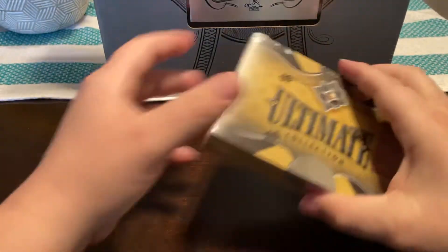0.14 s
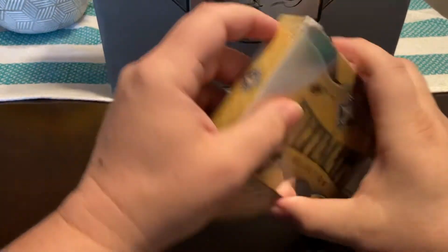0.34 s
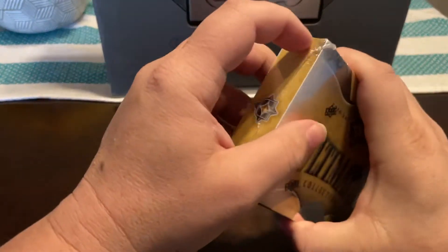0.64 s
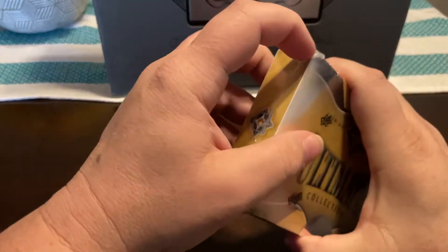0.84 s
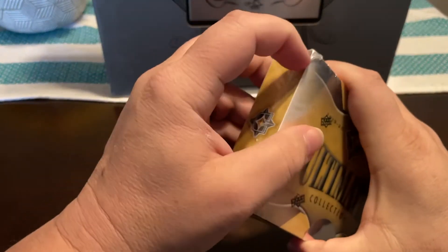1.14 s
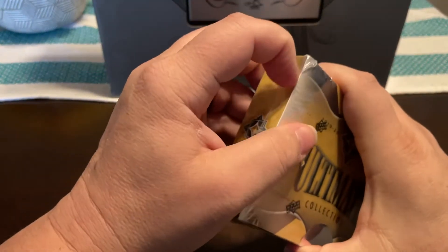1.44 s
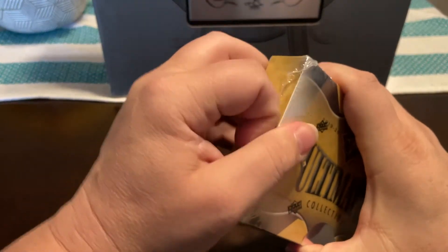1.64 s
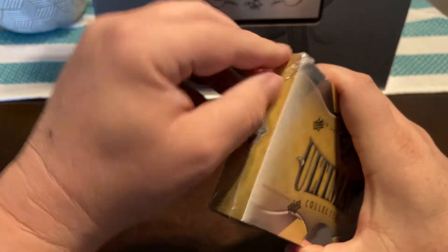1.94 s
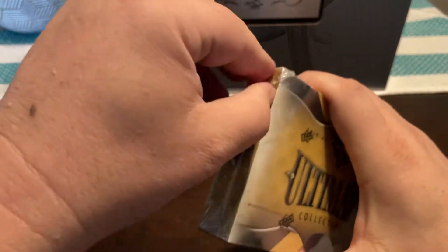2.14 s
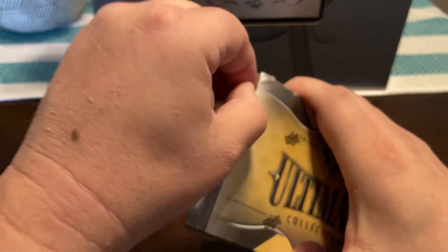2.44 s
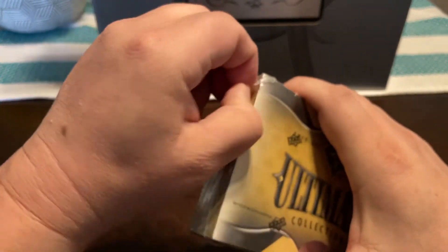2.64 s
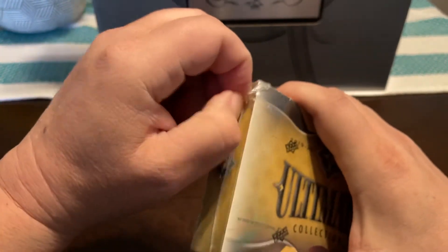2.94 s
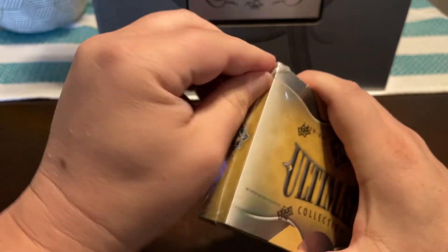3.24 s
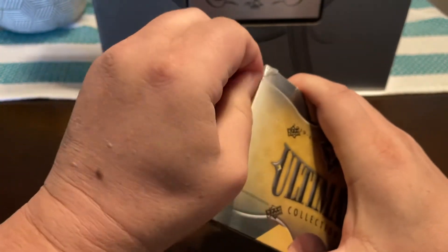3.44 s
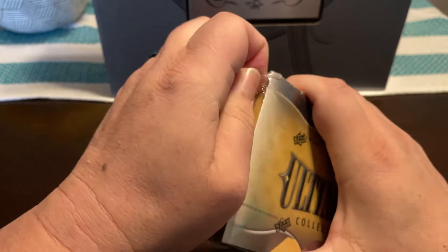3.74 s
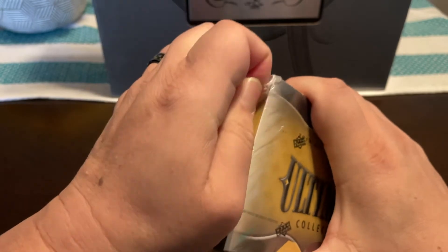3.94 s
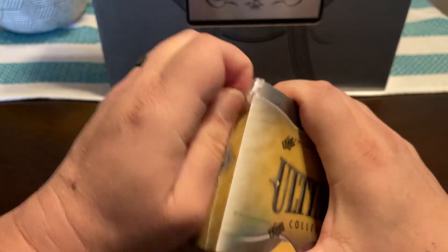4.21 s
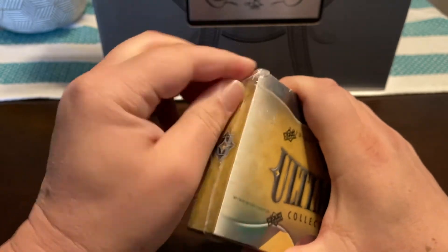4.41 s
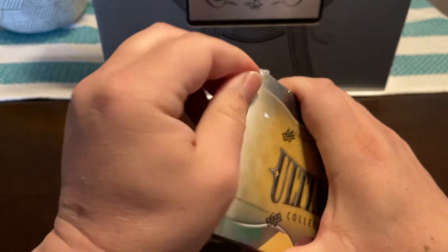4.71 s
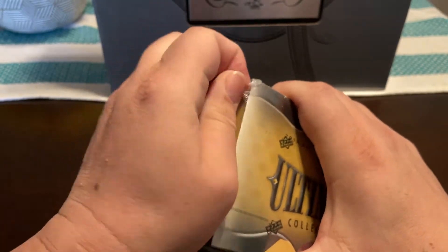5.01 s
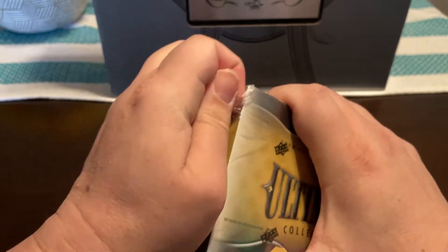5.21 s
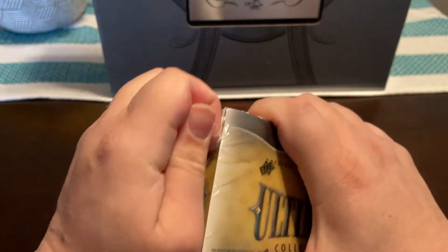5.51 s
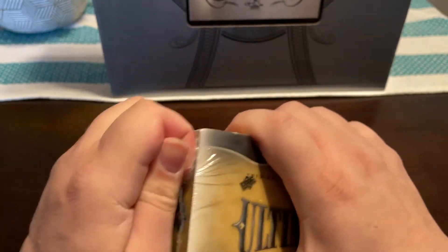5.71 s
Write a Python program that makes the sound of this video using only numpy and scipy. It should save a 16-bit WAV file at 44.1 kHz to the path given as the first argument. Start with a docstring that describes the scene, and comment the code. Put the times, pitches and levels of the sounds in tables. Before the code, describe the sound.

Close, thin ticks and scratches of fingernails on a shrink-wrapped box, with dull knocks and a sharp snap early on.

```python
"""In a quiet room, fingers pick at tight shrink-wrap on a small cardboard box, close to two microphones.
Wrinkles of the film buckle with bright ticks and its blisters pop; nails and skin scrape and rustle by
stick-slip friction. Taps excite the hollow of the box, and once a nail slips off the edge, so that the
face springs back with a loud snap. The box knocks dully on the table; a low hum fills the room."""
import sys
import numpy as np
from scipy import signal
from scipy.fft import rfft, irfft
from scipy.io import wavfile
from scipy.ndimage import uniform_filter1d

SR = 44100
rng = np.random.default_rng(int(sys.argv[2]) if len(sys.argv) > 2 else 0)


def master(y):
    """Save y as 16-bit WAV."""
    cut = np.clip(np.atleast_2d(y).T, -1, 1)
    pcm = np.round(cut * 32767)  # scale
    wavfile.write(sys.argv[1], SR, pcm.astype(np.int16))


N = 258426
TIME = np.arange(N) / SR

# spectra of the card under a nail and of the rustling film: frequency_hz, relative_db
CARD_SPECTRUM = [(150, -13.5), (380, 0), (560, -9), (780, -5), (1000, 7), (1140, -1.5), (1300, 6.5),
                 (1520, -9.5), (1900, -1), (2600, -6.5), (4000, -10.5), (7000, -26)]
FILM_SPECTRUM = [(1000, -20.5), (2500, -7.5), (4000, -1.5), (6300, -2.5), (8300, -10.5), (10500, -1.5),
                 (12500, -8.5), (14000, -6), (16500, -28.5)]
# the snap of the box face as the nail slips off: time_s, peak_db
SNAP = (1.455, -3)


def film_ticks(strays, span_s=0.0042):
    """Buckling: each wrinkle gives a bright tick at its own pitch and a broader, lower crack."""
    # the clearest wrinkles: start_s, level_db, crack_relative_db, pitch_hz
    wrinkles = [(0.1703, -54, -1, 13200), (0.8374, -42, -5, 12300), (0.84, -50, -3, 10600),
                (1.039, -57, -15, 13900), (1.1358, -60, -19.5, 10300), (1.1495, -46, -5, 9460),
                (1.166, -34.5, -16, 10100), (1.1852, -47, -13, 10400), (1.2042, -41.5, -11.5, 11000),
                (1.294, -54.5, -1, 10700), (1.316, -40.5, -5, 10000), (1.3242, -43, -2, 11000),
                (1.3369, -35.5, -2.5, 9500), (1.4323, -53, -2.5, 11900), (1.4415, -49, 5, 13000),
                (1.4518, -22.5, -3.5, 9950), (1.595, -59, 2, 11900), (1.6337, -58, 2, 11200),
                (1.701, -63.0, 7.5, 10300), (1.8107, -46.5, -9.5, 10700), (1.8188, -55, -7.5, 10200),
                (1.831, -49.5, -5, 10200), (1.8342, -51, 2, 12900), (1.8596, -64, 5, 9300),
                (1.8807, -56, 11, 10700), (1.9032, -53.5, 0.5, 10500), (1.9078, -50, -5, 13900),
                (1.9628, -35.0, -11, 12300), (1.978, -51.5, -23, 11000), (1.9884, -30.5, -3.5, 11200),
                (2.0351, -40, -5, 10500), (2.0728, -60, 6.5, 10800), (2.1818, -50.5, 1.5, 10500),
                (2.1927, -56.5, -7, 10800), (2.263, -48, -7, 12900), (2.3233, -47, -6.0, 11900),
                (2.3402, -54, -3.0, 13700), (2.408, -63.5, 7.5, 12500), (2.5297, -58.5, -10, 9800),
                (2.5872, -44.5, -8, 9800), (2.619, -53, -2.5, 8540), (2.6367, -53, -6.5, 13560),
                (2.8508, -57, -0.5, 13500), (2.8783, -57, -14, 10800), (2.8853, -63, 9.5, 9300),
                (2.9044, -60.5, 9.0, 10600), (2.9192, -54.5, 7.5, 9600), (2.9418, -62, 8.0, 9900),
                (2.977, -61, 3, 11900), (3.0481, -56, 5, 11420), (3.0883, -52, -2.5, 10600),
                (3.1029, -62.5, 4.5, 10700), (3.136, -61.5, -6.5, 10940), (3.1905, -51, -9.5, 14700),
                (3.2203, -64.5, 9, 10650), (3.228, -60, -2.5, 11000), (3.39, -59.5, 1.5, 9850),
                (3.585, -55.0, -6, 11300), (3.6707, -58.5, 3.5, 9600), (3.6953, -52.5, -7, 9900),
                (3.706, -58, -4, 13600), (3.7323, -50.5, -8, 12800), (3.7476, -53, -4, 9600),
                (3.7747, -50.5, -16, 10500), (3.8018, -56, 5, 10400), (3.811, -49.5, -0.5, 10900),
                (3.8165, -52.5, -2, 11100), (3.8906, -51.5, -18, 11300), (3.8972, -51, -11.5, 10000),
                (3.928, -55.5, -2, 9100), (3.953, -50.5, 4.5, 9800), (4.0675, -59.5, -7.0, 14000),
                (4.087, -49, -10, 14500), (4.1021, -48, -6, 12300), (4.1216, -43, -1.5, 10100),
                (4.1286, -48, -1, 10500), (4.1409, -42.5, -5, 10000), (4.1687, -49.0, 4, 9700),
                (4.1938, -58, -9, 11000), (4.4923, -39, -6, 11000), (4.535, -55, 3, 10900),
                (4.561, -61, 6, 9900), (4.5821, -60, -11, 12300), (4.598, -52.5, -12, 11200),
                (4.679, -59, -2, 9000), (4.6987, -38, -11.5, 13300), (4.7046, -44.5, -13.5, 11300),
                (4.7333, -47.5, -8, 10800), (4.7664, -57, -2, 9500), (4.7912, -44, -7.5, 9100),
                (4.7954, -46.5, -6, 9700), (4.8504, -49, -5.5, 11300), (4.8683, -52.5, -2, 13500),
                (4.9528, -56.5, 1, 14100), (4.9887, -41, -12, 10000), (4.992, -49, -8.0, 12200),
                (4.996, -58, 6.5, 10900), (5.0797, -55, 4.0, 7900), (5.127, -66, 5.0, 11900),
                (5.175, -48.5, -6, 10400), (5.188, -60.5, 2, 11600), (5.2015, -58.0, 4, 11700),
                (5.2349, -59.5, -6.5, 14200), (5.2486, -53.0, -12, 15200), (5.2596, -65, 7, 10600),
                (5.3423, -42.5, -3.5, 9800), (5.4121, -36.5, -6.5, 10600), (5.4408, -46, -0.5, 12600),
                (5.4874, -49.5, 0.5, 12300), (5.4925, -47.5, -5, 9600), (5.5101, -54, -19, 13700),
                (5.534, -54, -3.0, 9900), (5.7081, -51.5, 6.5, 10000), (5.7183, -51.0, 0, 11200),
                (5.7352, -56, -14, 12800), (5.7564, -47.5, -1, 10500), (5.7659, -50, -5.0, 12400),
                (5.7762, -42.5, 4, 11900), (5.787, -51, -12, 10600), (5.797, -52, -11, 11500)]
    # spectrum of a tick: pitch_ratio, relative_db
    tick_shape = [(0.198, -54.5), (0.572, -31.5), (0.8, -5.5), (0.942, 1), (1.05, 2.5), (1.18, -5),
                  (1.38, -5.5), (1.572, -18)]
    # spectrum of a crack: frequency_hz, relative_db
    crack_shape = [(300, -24.5), (1200, -7), (2500, -6), (4000, 1), (6300, 4), (8000, -4.5), (11000, -22.5)]
    out = np.zeros((2, N))
    for start, db, crack_db, pitch_hz in wrinkles + strays:
        release = burst(decay_s=.0007, scatter_db=-3, apart=.6)
        tick = colour(release, [(ratio * pitch_hz, level) for ratio, level in tick_shape])
        stretch = rng.uniform(.8, 1.2)
        rasp = burst(decay_s=0.0022, scatter_db=8, apart=1.2)
        crack = colour(rasp, [(hz * stretch, level) for hz, level in crack_shape])
        add(out, start, sized(tick, db, span_s) + sized(crack, db + crack_db, span_s))
    return out


def stray_wrinkles(on_film, per_s=22, above_drag_db=3, scatter_db=3.5, crack_db=-1.5, pitch_hz=10100):
    """A Poisson process: rows for film_ticks at random times, louder as the film is dragged harder."""
    onsets = np.flatnonzero(rng.random(N) < per_s / SR)
    db = 20 * np.log10(on_film) + above_drag_db + scatter_db * rng.standard_normal(N)
    return [(i / SR, db[i], crack_db, pitch_hz * (1 + 0.11 * rng.uniform(-1, 1))) for i in onsets]


def blister_pops(span_s=0.0041):
    """Snap-through: a loose patch of film flips with a rasp, in three modes that the finger damps."""
    # blisters popping against the card: start_s, level_db, pitch_hz
    blisters = [(1.034, -61.5, 1260), (1.296, -40.5, 1400), (1.318, -39.5, 1410), (1.7, -53.5, 1260),
                (1.8334, -40.5, 1510), (1.859, -42, 1400), (1.906, -50, 1370), (2.953, -47, 1227),
                (3.671, -54, 3505), (3.695, -50.5, 1280), (3.733, -52, 1100), (3.769, -49, 1050),
                (3.829, -50.5, 2300), (3.83, -58, 4400), (3.881, -47, 1040), (4.098, -45.5, 1030),
                (4.17, -41.5, 1004), (4.539, -51, 1340), (4.727, -60, 1100), (4.766, -59.5, 1165),
                (4.843, -51.5, 1160), (4.857, -48.5, 2770), (4.953, -53.5, 1160), (4.996, -45.5, 3600),
                (5.002, -55.5, 1250), (5.016, -56, 1050), (5.049, -48.5, 1090), (5.081, -57, 1080),
                (5.109, -50.5, 3430), (5.113, -49.5, 6000), (5.19, -50, 890), (5.258, -40, 2090),
                (5.443, -46, 1330)]
    out = np.zeros((2, N))
    for start, db, hz in blisters:
        t60 = 11 / hz + .0015
        second_hz, third_hz = hz * rng.uniform(1.15, 1.5), hz * rng.uniform(1.8, 2.6)
        patch = ring([(hz, 0, t60), (second_hz, -5, t60), (third_hz, -9, t60 / 2)], size=2048)
        pop = signal.fftconvolve(burst(decay_s=0.0011, scatter_db=5.5), patch[None], axes=1)
        add(out, start, sized(pop, db, span_s))
    return out


def face_snap(size=6000):
    """Free vibration: the released box face springs back, and its modes ring off and stir the room."""
    # modes of the card face: frequency_hz, relative_db, t60_s
    modes = [(380, -18, .026), (620, -25, .024), (935, -3.5, .018), (1360, 0, .023), (1530, -8, .024),
             (1782, -5, .022), (2150, -15, .02), (2517, -19, .016), (3810, -17, .014), (4046, -17, .012)]
    snap_s, peak_db = SNAP
    t = np.arange(-size, size) / SR
    swing = np.exp(-(np.minimum(t, 0) / .0012) ** 2)  # rises in about a millisecond
    age = np.maximum(t, 0)
    face = swing * sum(gain_of(db - 60 * age / t60) * np.sin(2 * np.pi * hz * t) for hz, db, t60 in modes)
    out = np.zeros((2, N))
    add(out, snap_s + t[0], mic_pair(gain_of(peak_db) * face / abs(face).max(), lag_samples=3))
    return out + reverberation(out, tail_db=-27.5, early_db=-27)


def snap_tail(level_db=-37, fade_db_per_s=230, length_s=.14):
    """Exponential decay: a short, grainy crunch near 1.4 kHz fades after the snap."""
    # spectrum of the crunch: frequency_hz, relative_db
    spectrum = [(300, -19.5), (800, -14.5), (1150, -8), (1400, 2), (1750, -1), (2600, -11), (4000, -13),
                (7000, -17), (12000, -23)]
    t = np.arange(round(length_s * SR)) / SR
    crunch = colour(stick_slip(per_s=900, spread_db=0.5, hiss_db=-6.5), spectrum)[:, :len(t)]
    out = np.zeros((2, N))
    add(out, SNAP[0], unit_rms(crunch) * gain_of(level_db - fade_db_per_s * t))
    return out


def box_taps(contact_s=.0012, span_s=0.0097, size=4096):
    """Impact: a fingertip sounds the cavity and the walls, whose modes the grip shifts; the nail clacks."""
    # fingers meeting the box: start_s, knock_db, pitch_hz, t60_s, nail_db
    taps = [(0.081, -37, 415, 0.022, -47), (0.105, -40.5, 347, 0.025, -54), (0.2, -40.5, 405, 0.026, -46),
            (0.407, -59, 320, 0.024, -49), (0.838, -43.5, 395, 0.03, -40), (0.8451, -35, 343, 0.058, -49.5),
            (0.912, -48.5, 354, 0.027, -60.5), (1.295, -46, 420, 0.025, -54.5),
            (1.333, -39.5, 285, 0.052, -42), (1.833, -43.5, 380, 0.04, -47.5),
            (1.859, -41, 360, 0.043, -38), (1.989, -34, 375, 0.022, -38), (2.904, -53, 444, 0.034, -46),
            (3.221, -56.5, 374, .025, -53), (3.482, -42, 324, 0.011, -53), (3.767, -56.5, 390, 0.024, -51),
            (4.17, -64, 513, 0.011, -46), (4.198, -41, 403, 0.018, -47), (4.215, -35.5, 419, 0.07, -46),
            (4.342, -42, 415, 0.029, -53), (4.526, -39.5, 395, 0.033, -52.5), (4.841, -55, 278, 0.03, -57),
            (5.129, -48.5, 403, 0.028, -48.5), (5.246, -45.5, 327, 0.023, -53.5),
            (5.411, -69, 337, 0.017, -44.5), (5.446, -70, 503, 0.027, -53), (5.657, -46.5, 298, 0.032, -57),
            (5.779, -52.5, 290, 0.016, -42)]
    out, t = np.zeros((2, N)), np.arange(size) / SR
    onset = 1 - np.exp(-t / contact_s)
    for start, knock_db, hz, t60, nail_db in taps:
        lower, upper = rng.uniform(0.7, .8), rng.uniform(1.1, 1.8)
        knock = onset * ring([(hz, 0, t60), (hz * lower, -8, t60), (hz * upper, -14, t60)], size)
        clack = colour(burst(decay_s=0.0044, scatter_db=4.5), CARD_SPECTRUM)
        add(out, start, mic_pair(sized(knock, knock_db, span_s)))
        add(out, start, sized(clack, nail_db, span_s))
    return out


def nail_scrapes(film_trim_db=-1):
    """Stick-slip: a dragged nail catches and lets go hundreds of times a second, shaking card and film."""
    # strokes of the nail: start_s, end_s, card_db, film_db
    strokes = [(0.071, 0.13, -49, -59.5), (0.179, 0.202, -46.5, -65), (0.834, 0.862, -49.5, -65),
               (1.311, 1.359, -46.5, -72), (1.448, 1.46, -23.5, -32.5), (1.566, 1.636, -50.5, -50),
               (1.694, 1.726, -56, -65.5), (1.814, 1.89, -51, -59), (1.981, 2.01, -49, -57),
               (2.907, 2.952, -50.5, -61.5), (3.773, 3.865, -59, -86), (4.076, 4.186, -52, -52),
               (4.168, 4.216, -42, -46.5), (4.305, 4.354, -47, -58), (4.513, 4.541, -52.5, -59),
               (4.934, 5.065, -66, -79), (5.175, 5.213, -57, -72), (5.246, 5.27, -44.5, -60),
               (5.75, 5.811, -54.5, -49)]
    on_card, on_film = np.zeros((2, N))
    for start, end, card_db, film_db in strokes:
        stroke = signal.windows.tukey(round((end - start) * SR), 0.099)
        add(on_card, start, gain_of(card_db) * stroke)
        add(on_film, start, gain_of(film_db) * stroke)
    friction = stick_slip(per_s=800, spread_db=4, hiss_db=-6)
    card = colour(friction * on_card, CARD_SPECTRUM)
    film = colour(friction * on_film, FILM_SPECTRUM)
    return moving_contact(card + gain_of(film_trim_db) * film, depth_db=3)


def finger_drag(rise_share=0.32, fall_share=0.36):
    """Frictional drive: envelopes for card and film, from a creeping grip and slides that swell and fade."""
    # creep of the grip: time_s, card_db
    grip = [(0, -60), (0.55, -67.5), (0.79, -67.5), (1.03, -69.5), (1.26, -63), (1.45, -62), (1.95, -60),
            (2.75, -72), (3.35, -67), (3.9, -59), (4.45, -62), (5.2, -62.5), (5.6, -57), (5.86, -58)]
    # slides of a fingertip: start_s, length_s, card_db, film_db
    slides = [(0.086, 0.28, -52.5, -67.5), (0.338, 0.23, -59, -70), (0.579, 0.15, -63.5, -77),
              (1.454, 0.095, -65, -55), (1.522, 0.18, -53.5, -77), (2.005, 0.13, -57.5, -75),
              (2.152, 0.23, -54, -63.5), (2.388, 0.34, -65, -85), (2.823, .21, -56.5, -64.5),
              (3.164, 0.11, -63, -70.5), (3.392, 0.18, -62, -66), (3.768, 0.29, -62, -66.5),
              (4.04, 0.29, -64.5, -79), (4.53, 0.073, -60, -73), (4.818, 0.42, -65, -78),
              (5.244, 0.075, -48, -90), (5.309, 0.19, -57, -61.5), (5.669, 0.18, -53.5, -58)]
    creep = gain_of(np.interp(TIME, *np.transpose(grip)))
    drag = np.array([creep, gain_of(-14) * creep])  # the film takes a small share
    for start, length, card_db, film_db in slides:
        progress = np.linspace(0, 1, round(length * SR))
        swell = np.minimum(np.minimum(progress / rise_share, (1 - progress) / fall_share), 1)
        add(drag, start, gain_of([[card_db], [film_db]]) * swell)
    return drag


def skin_rubbing(on_card, on_film, rustle_gain_db=-5, prickle_gain_db=-6):
    """Sliding friction: skin on the wrap makes a soft rustle, and stray wrinkles prickle."""
    # the card under a soft pad, flatter than under a nail: frequency_hz, relative_db
    skin_spectrum = [(150, -8.5), (380, 2.5), (620, -3.5), (900, -2.5), (1100, -0.5), (1400, -2.5),
                     (1900, -4.5), (2700, -8), (4000, -11), (7000, -24)]
    friction = stick_slip(per_s=370, spread_db=0.5, hiss_db=6)
    rustle = colour(friction * on_card, skin_spectrum) + colour(friction * on_film, FILM_SPECTRUM)
    prickle = colour(stick_slip(per_s=45, spread_db=3, hiss_db=-40) * on_film, FILM_SPECTRUM)
    rubbing = gain_of(rustle_gain_db) * rustle + gain_of(prickle_gain_db) * prickle
    return moving_contact(rubbing, depth_db=4)


def singing_glides(relative_half_width=.22):
    """Forced resonance: friction feeds one broad mode of the stretched patch under the finger."""
    # glides of skin or nail: start_s, end_s, level_db, pitch_hz
    glides = [(1.691, 1.748, -52.5, 1280), (1.826, 1.857, -40, 1400), (1.834, 1.89, -45, 427),
              (2.03, 2.52, -69, 1350), (2.044, 2.5, -68, 700), (2.237, 2.622, -70, 4630),
              (2.802, 2.845, -59.5, 734), (2.903, 2.935, -48, 984), (3.372, 3.552, -69, 3200),
              (3.436, 3.558, -72, 1770), (4.044, 4.22, -60, 1100), (4.572, 4.622, -55, 1050),
              (4.832, 4.936, -63.5, 2800), (4.93, 5.2, -69, 1100), (5.263, 5.31, -62.5, 3730),
              (5.767, 5.811, -56.5, 3360)]
    out, friction = np.zeros((2, N)), stick_slip(per_s=420, spread_db=3, hiss_db=-3.5)
    for start, end, db, hz in glides:
        drag = friction[:, round(start * SR):round(end * SR)]
        size = drag.shape[1]
        detuning = (np.fft.rfftfreq(size, 1 / SR) / hz - 1) / relative_half_width
        voiced = irfft(rfft(drag) / (1 + detuning ** 2), size)
        add(out, start, gain_of(db) * unit_rms(voiced) * signal.windows.tukey(size, .5))
    return out


def table_bumps():
    """Modal response: soft blows sound the low modes of the table, which sways once as the box lifts."""
    # modes of the table: frequency_hz, relative_db, t60_s
    modes = [(121.8, -3, 0.24), (231, 0, 0.062), (347, -18.5, 0.015)]
    # blows of the box: start_s, level_db
    blows = [(0.094, -36), (0.114, -41), (0.68, -37), (0.9145, -25), (1.4585, -26.5), (1.7084, -31),
             (1.722, -39), (2.008, -32.5), (3.492, -39.5), (4.188, -35), (5.131, -37.5), (5.254, -39),
             (5.69, -36), (5.848, -38.5)]
    # the sway: start_s, peak_db, pitch_hz, t60_s
    sway = (0.113, -35, 58, .11)
    out = np.zeros(N)
    thud = np.convolve(ring(modes), signal.windows.hann(64) / 32)  # soft contact spreads the force
    for start, db in blows:
        add(out, start, -gain_of(db) * thud)
    out = signal.sosfilt(signal.butter(2, 45, "high", fs=SR, output="sos"), out)
    start, db, hz, t60 = sway
    add(out, start, gain_of(db) * ring([(hz, 0, t60)]))
    return mic_pair(out)


def reverberation(x, tail_db=-16, early_db=-15):
    """Reflection: quick echoes from the table and things on it, then a short diffuse tail."""
    # decay of the room: frequency_hz, t60_s
    decay = [(100, 1), (400, 0.4), (1500, 0.21), (5000, 0.21), (10000, 0.12), (16000, 0.091)]
    hz, t, spectra = signal.stft(rng.standard_normal((2, SR // 2)), SR, nperseg=256)
    tail = signal.istft(spectra * gain_of(-60 * t / curve_at(decay, hz)[:, None]), SR, nperseg=256)[1]
    t = np.arange(tail.shape[1]) / SR
    tail *= np.clip((t - .004) / 0.0039, 0, 1)
    echoes = rng.standard_normal(tail.shape) * (rng.random(tail.shape) < .05)
    early = echoes * np.exp(-t / 0.0069) * (t > .002)
    response = sized(tail, tail_db, 1 / SR) + sized(early, early_db, 1 / SR)
    return signal.fftconvolve(x, response, axes=1)[:, :N]


def room_hum(hush_db=-62.5, apart=0.28):
    """Stationary noise: a hush, a low drone and steady tones, nearly coherent at the two microphones."""
    # bands of the drone: centre_hz, half_width_hz, rms_db
    bands = [(62, 17, -67), (105, 13, -61.5), (222, 29, -66.5)]
    # steady tones: frequency_hz, rms_db
    tones = [(60, -67.5), (119.8, -62), (211.6, -60.5)]
    # spectrum of the hush: frequency_hz, relative_db
    hush_spectrum = [(12, -40.5), (26, -14.5), (128, 1.5), (233, -5.5), (424, -13.5), (541, -27),
                     (751, -22), (1440, -27), (2490, -45), (5960, -59.5), (13500, -51)]
    hz = np.fft.rfftfreq(N, 1 / SR)
    def noise(gain):
        white = rng.standard_normal((3, N))
        return unit_rms(irfft(rfft(white[0] + apart * white[1:]) * gain, N))
    drone = sum(gain_of(db) * noise(1 / (1 + ((hz - f) / width) ** 2)) for f, width, db in bands)
    hum = sum(gain_of(db) * np.sqrt(2) * np.sin(2 * np.pi * (f * TIME + rng.random())) for f, db in tones)
    return drone + hum + gain_of(hush_db) * noise(gain_of(curve_at(hush_spectrum, hz)))


def burst(decay_s, scatter_db, apart=0.86, size=1024):
    """Scattering: an impulse spreads through film, hands and box, partly unlike at each microphone."""
    t = np.arange(size) / SR
    onset = 1 - np.exp(-t / .0004)
    paths = rng.standard_normal((3, size)) * np.exp(-t / decay_s) * onset
    scatter = mic_pair(paths[0]) + apart * paths[1:]
    direct = mic_pair(signal.unit_impulse(size))
    return direct + gain_of(scatter_db) * scatter / np.linalg.norm(scatter[0])


def stick_slip(per_s, spread_db, hiss_db):
    """Stick-slip friction: a random train of tiny releases of uneven strength over a smooth hiss."""
    strength = gain_of(spread_db * np.minimum(rng.exponential(1, N), 3.5)) * rng.choice([-1, 1], N)
    train = unit_rms(strength * (rng.random(N) < per_s / SR))
    grains = signal.oaconvolve(train[None], burst(decay_s=0.00079, scatter_db=8), axes=1)[:, :N]
    return unit_rms(unit_rms(grains) + gain_of(hiss_db) * rng.standard_normal((2, N)))


def moving_contact(x, depth_db):
    """Spectral modulation: as the contact moves, resonances come and go in patches of time and pitch."""
    spectra = signal.stft(x, SR, nperseg=256)[2]
    field = uniform_filter1d(rng.standard_normal(spectra.shape[1:]), size=5, axis=0)
    field = uniform_filter1d(field, size=6, axis=1)
    gain = unit_rms(gain_of(depth_db * unit_rms(field)))
    return signal.istft(spectra * gain, SR, nperseg=256)[1][:, :N]


def ring(modes, size=12000):
    """Damped modes (frequency_hz, relative_db, t60_s) struck together, with a peak of one."""
    t = np.arange(size) / SR
    x = sum(gain_of(db - 60 * t / t60) * np.sin(2 * np.pi * hz * t) for hz, db, t60 in modes)
    return x / abs(x).max()


def colour(x, spectrum, size=4096):
    """Minimum-phase filtering, with unit energy and the given spectrum."""
    log_gain = np.log(gain_of(curve_at(spectrum, abs(np.fft.fftfreq(size, 1 / SR)))))
    taps = np.fft.ifft(np.exp(signal.hilbert(log_gain).conj())).real[:size // 2]
    return signal.oaconvolve(np.atleast_2d(x), taps[None] / np.linalg.norm(taps), axes=1)[:, :x.shape[-1]]


def mic_pair(x, lag_samples=5):
    """Path difference: the sound reaches the right microphone just after the left."""
    return np.array([x, np.roll(x, lag_samples)])


def gain_of(db):
    """Decibels to amplitude."""
    return 10 ** (np.asarray(db) / 20)


def unit_rms(x):
    """Normalisation to an rms of one."""
    return x / np.sqrt(np.mean(x ** 2) + 1e-20)


def sized(x, db, span_s):
    """Equal energy: scales a short sound to match a level db held for span_s."""
    return x * gain_of(db) * np.sqrt(span_s * SR / (np.sum(x ** 2, -1, keepdims=True) + 1e-20))


def curve_at(points, hz):
    """Interpolation of a table on a log-frequency axis."""
    f, value = np.transpose(points)
    return np.interp(np.log(hz + 1), np.log(f + 1), value)


def add(mix, start_s, sound):
    """Superposition: mixes a sound in at start_s."""
    part = mix[..., max(0, round(start_s * SR)):][..., :sound.shape[-1]]
    part += sound[..., :part.shape[-1]]


def scene():
    """Superposition: the direct sound of film and box, its reverberation and the hum of the room."""
    on_card, on_film = finger_drag()
    background = room_hum()
    box = box_taps() + nail_scrapes() + singing_glides() + skin_rubbing(on_card, on_film)
    box += face_snap() + snap_tail() + table_bumps()
    film = blister_pops() + film_ticks(stray_wrinkles(on_film))
    return film + box + reverberation(film + box) + background


def record(dry, cutoff_hz=16400):
    """Diffraction: the camera body shades and delays sound between its microphones; a low-pass follows."""
    # effect of the body: frequency_hz, left_minus_right_db, right_lead_rad
    housing = [(100, 1, 0), (2384, 2, 0), (3400, 2.5, 0.5), (4700, 1.5, 0), (6530, 5, 0), (8960, 7.5, 3.5),
               (9430, -5, 5.5), (10230, 0, 7), (13000, 0.5, 10.5), (14200, .5, 14.5), (16400, .5, 15)]
    hz = np.fft.rfftfreq(N, 1 / SR)
    f, balance_db, lead_rad = np.transpose(housing)
    left_gain = gain_of(np.interp(hz, f, balance_db) / 2) * np.exp(-.5j * np.interp(hz, f, lead_rad))
    heard = irfft(rfft(dry) * np.array([left_gain, 1 / left_gain]), N)
    low_pass = signal.firwin(511, cutoff_hz, window=("kaiser", 9), fs=SR)
    return signal.oaconvolve(heard, low_pass[None], "same")


dry = scene()
out = record(dry)
master(out)
```